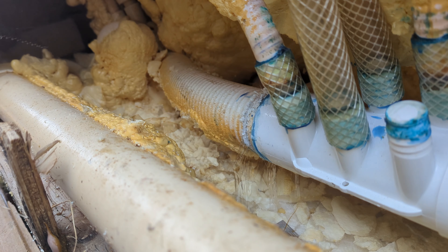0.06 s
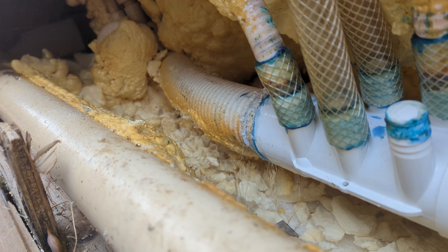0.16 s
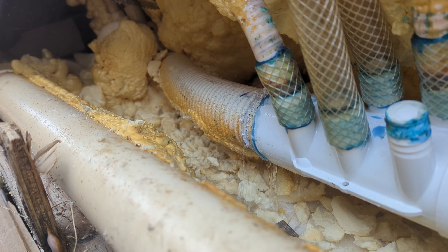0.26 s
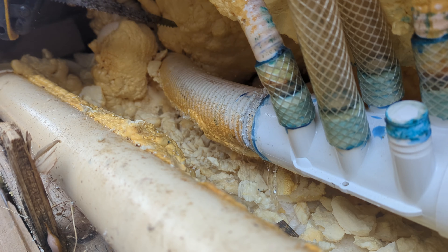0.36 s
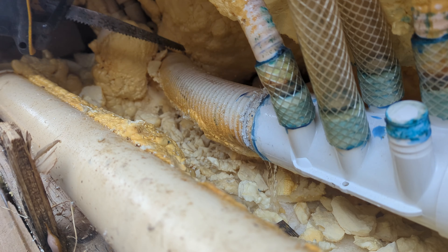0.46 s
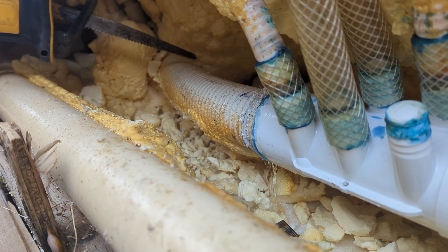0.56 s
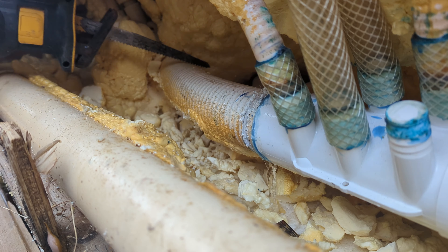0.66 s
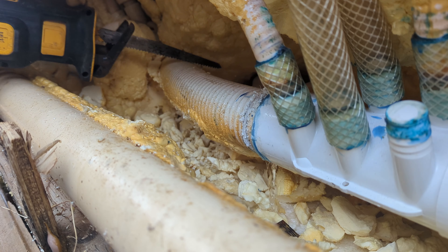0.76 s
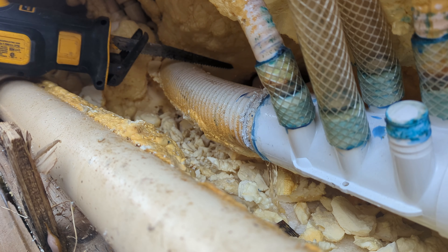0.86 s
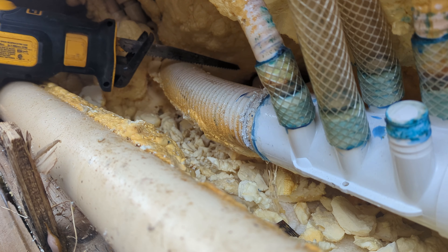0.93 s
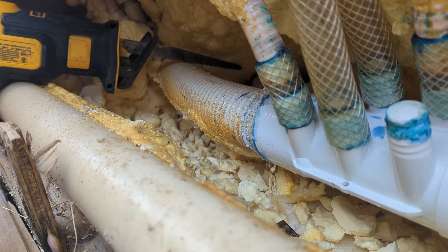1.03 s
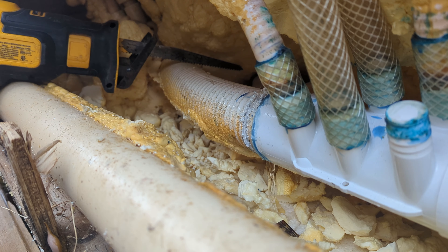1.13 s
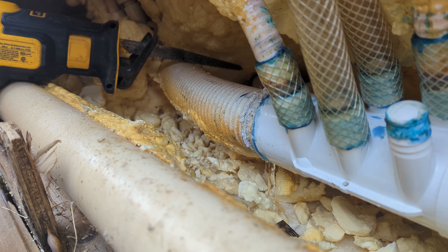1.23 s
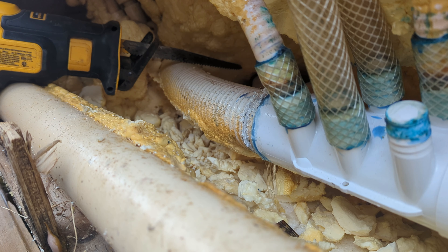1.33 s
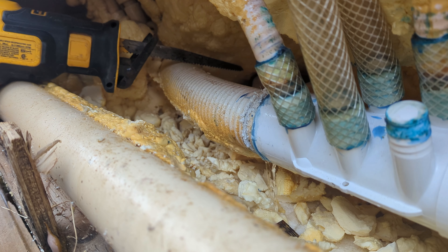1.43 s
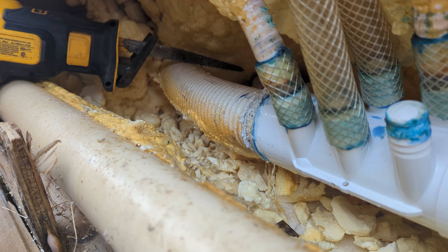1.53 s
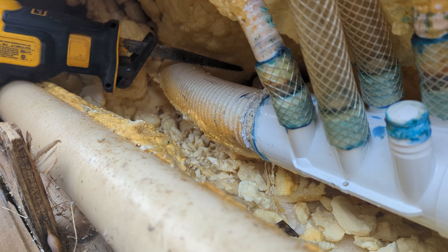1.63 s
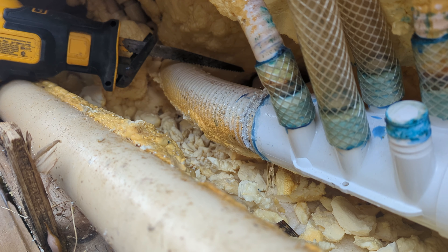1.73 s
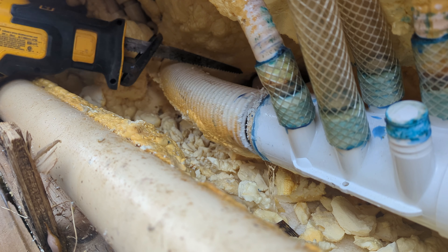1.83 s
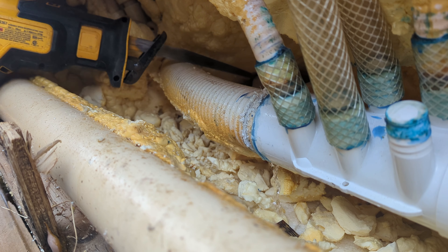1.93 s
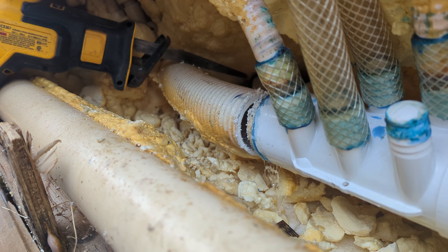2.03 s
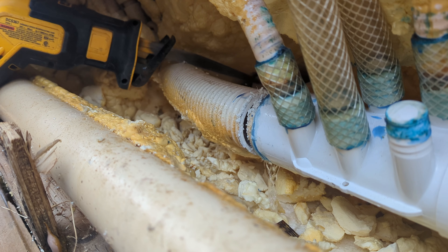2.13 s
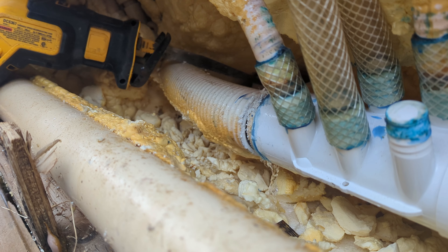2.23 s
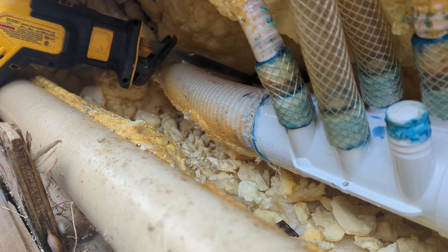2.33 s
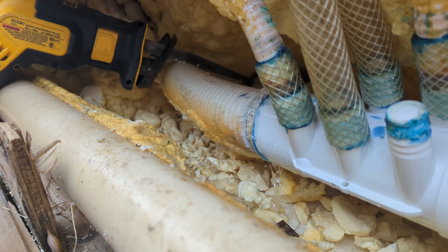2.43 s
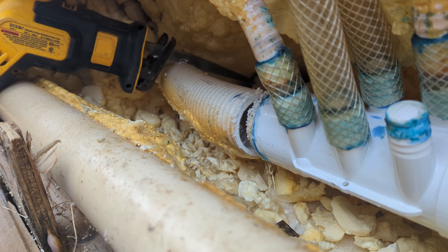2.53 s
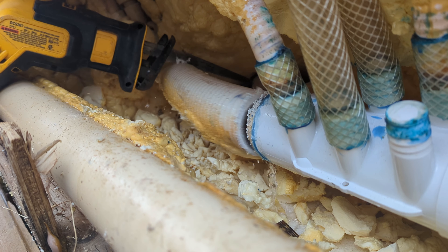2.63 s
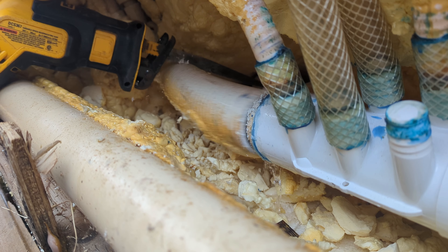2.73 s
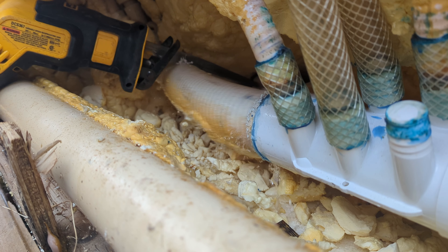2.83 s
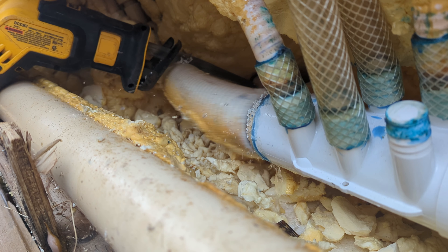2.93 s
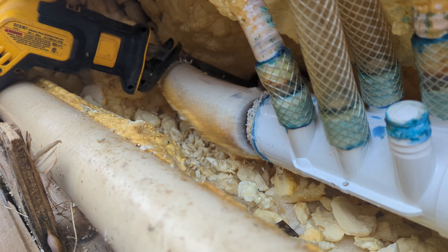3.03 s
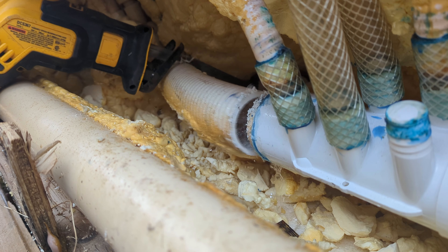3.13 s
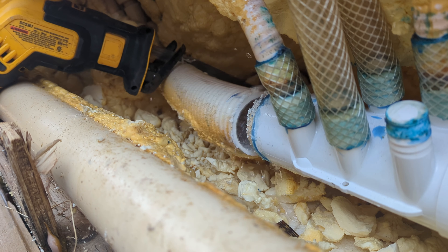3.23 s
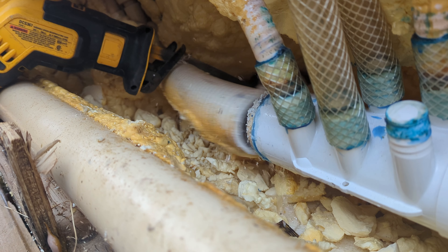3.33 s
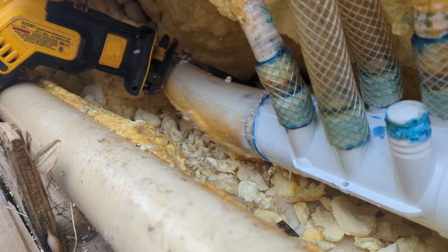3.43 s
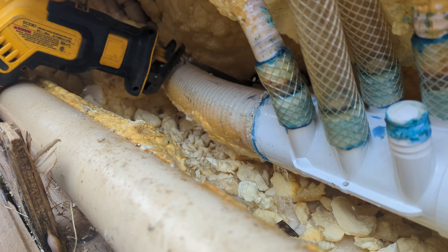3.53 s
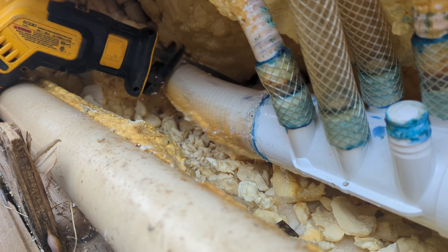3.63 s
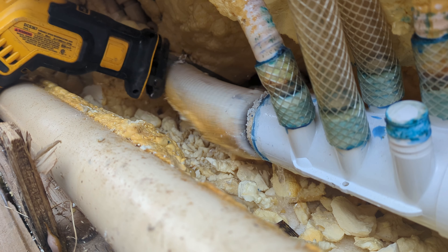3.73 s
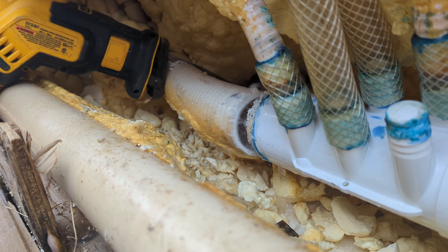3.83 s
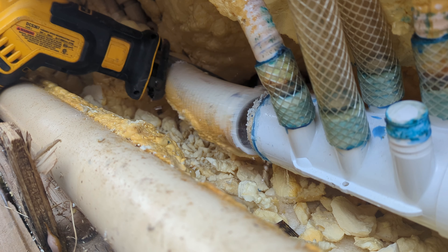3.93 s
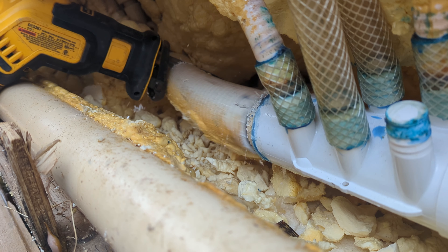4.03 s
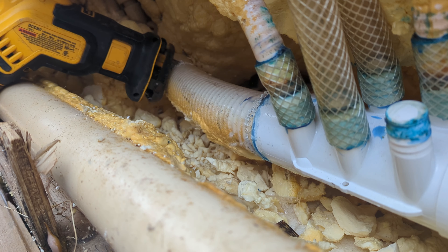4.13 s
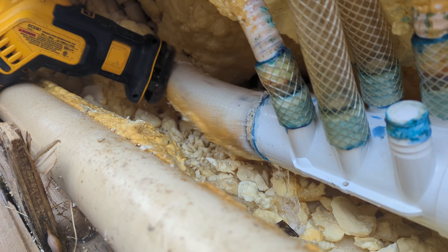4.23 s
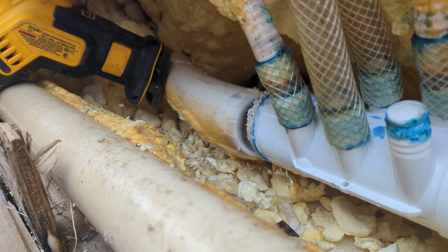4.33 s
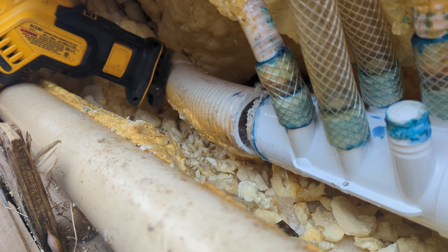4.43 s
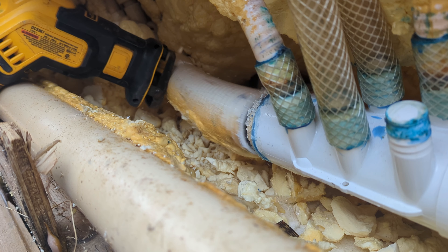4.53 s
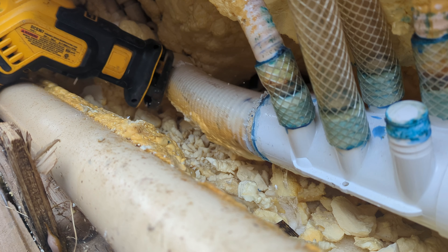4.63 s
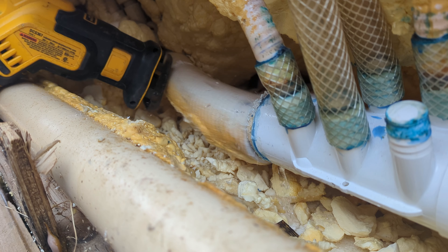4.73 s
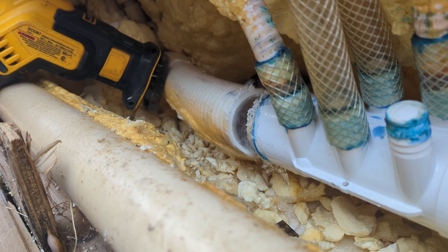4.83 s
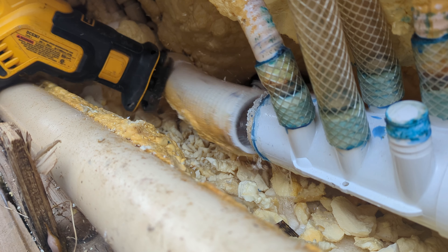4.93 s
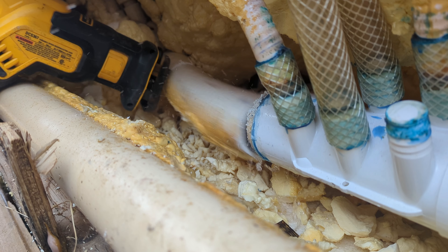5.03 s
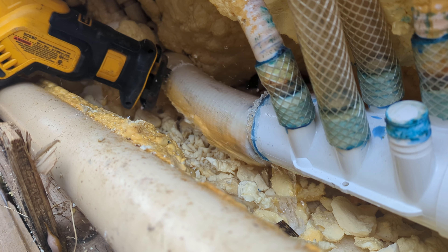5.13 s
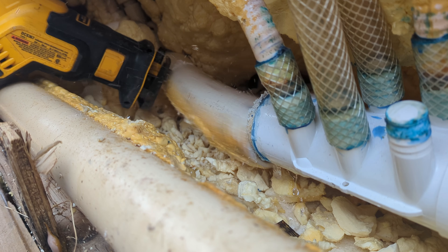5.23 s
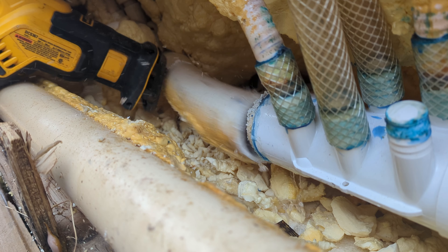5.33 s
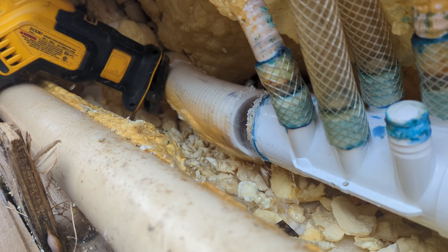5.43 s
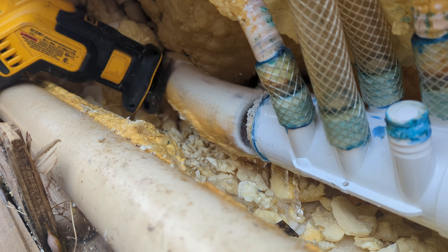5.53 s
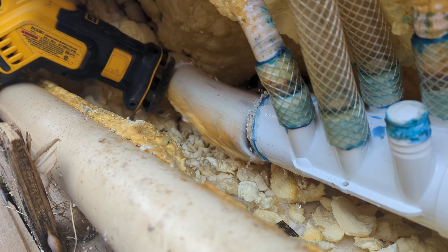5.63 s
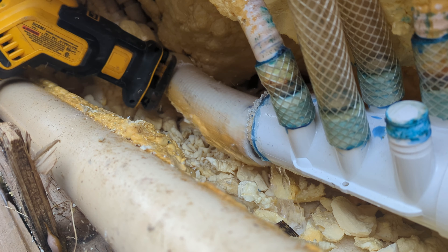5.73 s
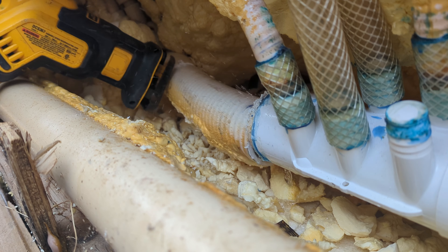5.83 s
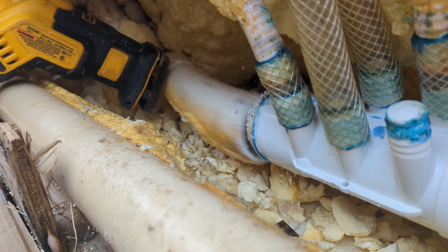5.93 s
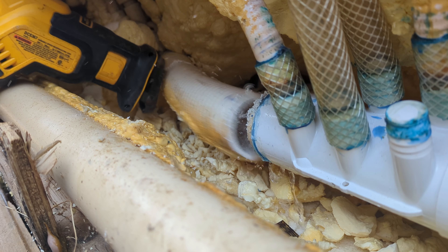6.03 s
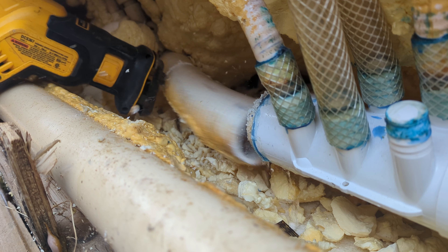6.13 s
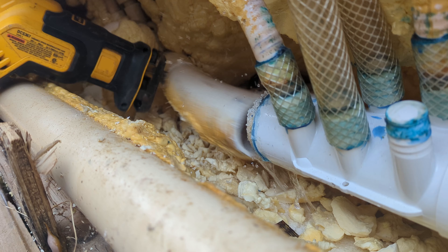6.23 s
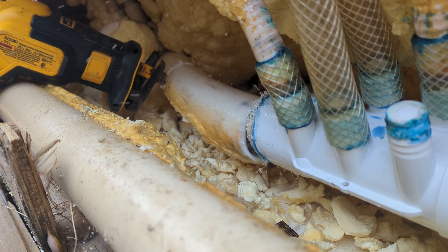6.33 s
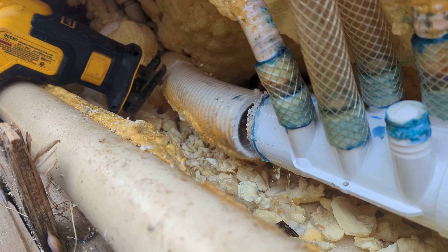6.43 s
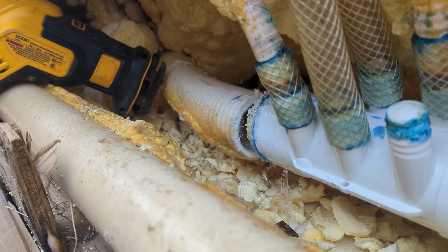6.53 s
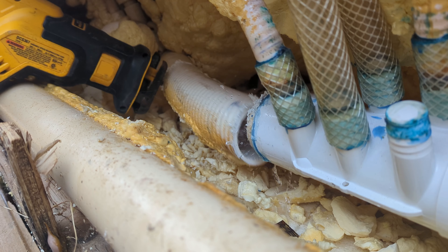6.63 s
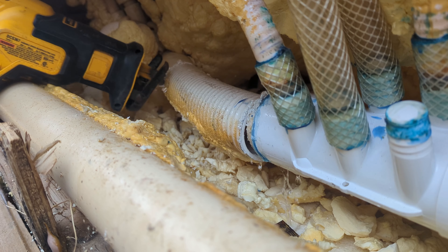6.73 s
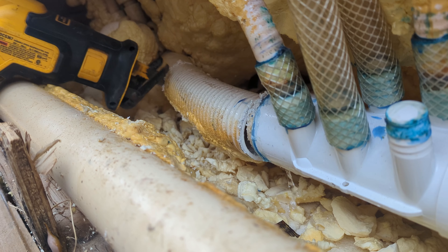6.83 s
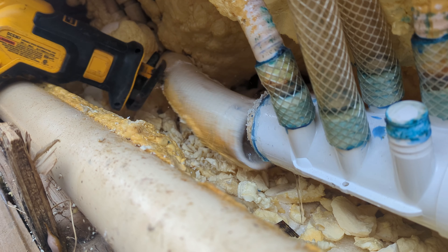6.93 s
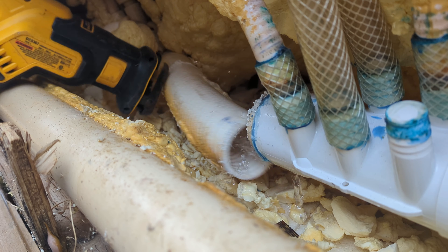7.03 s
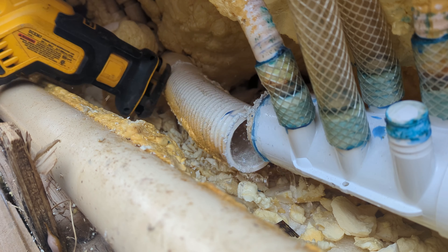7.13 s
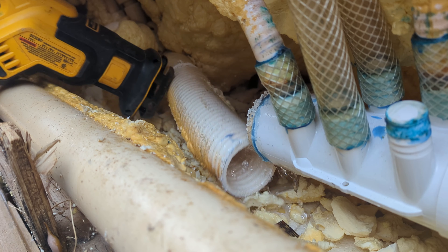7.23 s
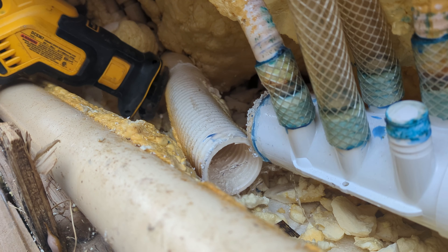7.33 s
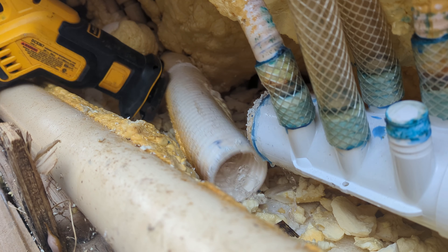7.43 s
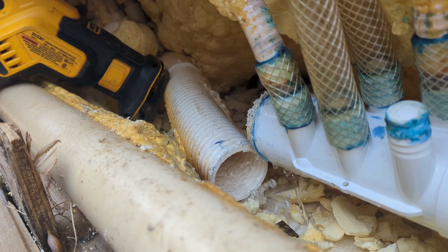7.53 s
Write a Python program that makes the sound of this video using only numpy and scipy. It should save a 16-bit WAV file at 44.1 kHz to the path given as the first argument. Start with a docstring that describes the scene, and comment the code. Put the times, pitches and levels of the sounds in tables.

```python
"""A cordless saw cuts a plastic hose

A reciprocating (back-and-forth) saw is pushed into a foam-lined cavity, set on a ribbed hose and started.
Every stroke thumps the housing, knocks the hose and clacks in the drive while the teeth rasp.
Once the hose hangs loose it booms freely and slaps about on every other stroke or so.
Sounds are built in two rows: mid (what both ears share) and side (how they differ)."""
import sys
import numpy as np
from scipy import signal
from scipy.fft import rfft, irfft, next_fast_len
from scipy.io import wavfile
from scipy.ndimage import uniform_filter1d

SR = 44100
rng = np.random.default_rng(int(sys.argv[2]) if len(sys.argv) > 2 else 0)


def to_wav(sig):
    """Store sig (one row per channel, or 1-D mono) as 16-bit WAV at the path in sys.argv[1].

    Samples outside -1..1 are clipped; the rate is SR.
    """
    pcm = np.clip(np.atleast_2d(sig), -1, 1) * 32767
    pcm = np.round(pcm).astype(np.int16)
    wavfile.write(sys.argv[1], SR, pcm.T)  # frames by channels


N = 333837
TIME_S = np.arange(N) / SR
FFT_SIZE = next_fast_len(N + SR // 4)

# Saw speed; one crank turn is one stroke: time_s, strokes_per_s
STROKE_RATE = [(1.9, 22.17), (2.0, 26.83), (2.13, 28.1), (2.35, 27.72), (2.6, 27.93), (2.75, 36.62),
               (2.9, 38.63), (3.2, 38.84), (3.6, 38.51), (4.0, 38.22), (4.4, 38.35), (4.8, 37.68),
               (5.2, 38.35), (5.6, 38.37), (6.0, 38.63), (6.3, 37.0), (6.45, 41.0), (7.57, 40.5)]
# Strength of the four low booms: time_s, frame_db, floor_db, panel_db, hose_db
BOOM_LEVELS = [(1.829, -60.5, -59, -59, -53), (1.845, -43.5, -50, -48, -55), (1.89, -45, -48, -52, -53),
               (1.96, -54, -50, -50, -45), (1.978, -37, -37, -36, -35), (2.16, -30.5, -29, -30.5, -26.5),
               (2.3, -38.5, -31.5, -34, -30.5), (2.54, -41, -33, -24.5, -35), (2.8, -38, -38, -30.5, -32.5),
               (3.55, -38.5, -37, -32.5, -34.5), (3.82, -42, -41, -36.5, -29), (4.1, -52, -35, -31.5, -35),
               (4.35, -53, -41, -36.5, -32.5), (4.8, -57, -39.5, -38.5, -34.5),
               (5.15, -42, -35, -32.5, -29.5), (5.76, -42, -31, -30, -36.5),
               (6.11, -43, -32.5, -33.5, -26.5), (6.3, -41, -33, -31.5, -31), (6.5, -41, -35, -21, -31),
               (6.78, -36, -30.5, -28.5, -27), (6.9, -37, -40, -31.5, -35), (7.03, -39, -36, -24, -32),
               (7.57, -31.5, -30, -23.5, -51)]
# Their modes (pitches at which a thing likes to ring), in that order: pitch_hz, base_width_hz, delay_s
BOOM_MODES = [(78, 25, .004), (118, 25, -.003), (143, 28, .0015), (190, 25, 0.)]
# Knocks in the hose as the cut deepens: time_s, wall_db, bore_db, rib_db
KNOCK_LEVELS = [(2.01, -35, -48, -39.5), (2.2, -35.5, -44, -42), (2.9, -34, -36, -42),
                (3.28, -33.5, -29.5, -37), (3.62, -32, -32.5, -37), (4.18, -34, -37, -39),
                (4.7, -36.5, -35.5, -35.5), (5.05, -43, -41, -35.5), (5.2, -43, -39.5, -37.5),
                (5.33, -46.5, -49, -47), (5.45, -39.5, -37.5, -35.5), (6.05, -46, -40, -43),
                (6.47, -41.5, -45, -41.5), (6.88, -41.5, -48, -40), (7.57, -41, -44, -48.5)]
# Modes of the hose's wall, bore (hollow inside) and ribs: pitch_hz, base_width_hz, gain_db
WALL_MODES = [(231, 52, 1), (264, 67, 1), (319.3, 42, 6.5), (395, 110, -2), (482, 29, 0)]
BORE_MODES = [(575.6, 63, 5.5), (637, 48, -3.5)]
RIB_MODES = [(683, 55, 2), (774, 20.5, -1), (896, 70, -4.5), (1120, 36, -4.5)]
# Strength of the teeth and the drive: time_s, rasp_db, clatter_db
CUT_LEVELS = [(2.02, -32.5, -38.5), (2.25, -37, -40), (2.75, -35, -40), (2.95, -34.5, -38.5),
              (3.35, -36, -41), (3.6, -35, -40), (4.66, -36, -40.5), (5.17, -35.5, -41), (5.34, -37, -42.5),
              (5.65, -34, -40), (6.1, -35.5, -42), (6.5, -36, -45), (6.75, -34, -40), (6.87, -29, -34),
              (6.98, -34.5, -41.5), (7.57, -34.5, -40)]
# Where in a turn the teeth bite hardest, and how much they throb: time_s, position_turns, depth_db
THROB = [(1.9, 1.3, 2.5), (2.4, 1.3, 2), (2.8, 1.2, 1), (3.8, 1.1, 1), (4.2, .93, 3), (5.9, .95, 2.8),
         (6.2, .95, 1), (6.45, 1.15, 2.8), (7.0, 1.2, 1.5)]
# Slack in the drive, which sets how hard it clacks: time_s, slack_0_to_1
DRIVE_SLACK = [(1.9, .6), (2.05, 1.), (2.6, .9), (2.8, .4), (3.5, .4), (3.9, .9), (4.7, 1.), (5.9, .85),
               (6.1, .4)]
# Tone color of the teeth and the drive: frequency_hz, gain_db
RASP_SPECTRUM = [(530, -10.5), (900, -2), (1020, -1), (1160, 0), (1620, -2), (2310, -4), (2510, -4.5),
                 (3170, -8), (3500, -8), (3810, -10.5), (4740, -9.5), (5400, -15), (5700, -68), (7410, -18),
                 (12500, -120)]
CLATTER_SPECTRUM = [(3120, -27), (5300, -51), (5600, 4), (6410, 7), (7220, 5), (8150, 0.5), (8690, 5),
                    (9360, 3.5), (11900, 6.5), (15100, 7.5), (16000, -18)]
# Single hits: start_s, level_db, pitch_hz
HOSE_SLAPS = [(2.006, -23.5, 388), (5.411, -25, 640), (5.438, -25, 605), (5.545, -25, 755),
              (5.567, -23, 646), (5.726, -27, 1200), (5.805, -25, 1155), (5.853, -22, 560),
              (5.907, -26, 1200), (5.984, -21.5, 676), (6.008, -21, 610), (6.036, -23.5, 696),
              (6.069, -29, 700), (6.087, -20, 700), (6.196, -20, 990), (6.305, -27, 940), (6.335, -23, 770),
              (6.372, -28, 770), (6.407, -27.5, 966), (6.444, -18, 793), (6.493, -19, 760),
              (6.544, -24, 955), (6.555, -24.5, 716), (6.595, -25.5, 833), (6.631, -23.5, 730),
              (6.655, -23, 1046), (6.682, -21.5, 700), (6.706, -24.5, 820), (6.73, -20, 870),
              (6.78, -20, 1040), (6.829, -20, 671), (6.876, -20, 780), (6.929, -19.5, 466),
              (6.978, -19.5, 643), (7.027, -21, 863), (7.08, -27, 1010), (7.089, -21.5, 790),
              (7.123, -30, 804), (7.142, -22, 720), (7.215, -28, 885), (7.34, -29, 563), (7.383, -24, 653),
              (7.434, -24, 940), (7.484, -23.5, 1164), (7.54, -28.5, 910)]  # the hose hits the blade and the shoe (the saw's metal rest)
DRIVE_CLACKS = [(2.0523, -21, 11600), (2.16, -21, 12700), (2.087, -26, 8600), (3.6, -28, 11000),
                (3.74, -21, 10800), (4.325, -28, 11200), (4.36, -25, 10700), (4.7, -23, 11800),
                (4.755, -28, 11300), (4.8048, -24, 11500), (5.308, -22, 14000), (5.9802, -26, 13200),
                (6.727, -36, 11600), (7.0094, -30, 10100), (7.2673, -27, 11100)]  # the drive's sharpest clacks
CLINKS = [(1.832, -36, 4900), (1.9233, -36, 3680), (1.9507, -30, 3900), (1.9836, -28, 2890),
          (2.2396, -31, 4500), (2.2889, -29, 3600), (2.3832, -31, 2850), (2.4556, -32, 2850)]  # the trigger, and the loose blade settling in
TICKS = [(0.7, -48, 802), (0.716, -46, 1170), (0.744, -45, 1150), (0.765, -46, 1080), (0.908, -38.5, 1740),
         (0.915, -45, 1490), (0.909, -52, 9000), (0.935, -53, 8000), (1.029, -46, 1440),
         (1.033, -52, 10000), (1.046, -44, 1010), (1.545, -53, 5540), (1.832, -28, 1300),
         (1.901, -27, 1320)]  # small ticks of blade and trigger
HOSE_CREAKS = [(1.3, -67, 720), (1.555, -62, 657), (1.705, -54.5, 674)]  # the saw leans on the hose
# Blade and shoe ringing as they rub: start_s, end_s, pitch_hz, base_width_hz, level_db
METAL_RINGS = [(1.89, 1.95, 3620, 150, -49), (2.9, 4.0, 1170, 90, -48), (3.95, 6.1, 1200, 200, -43.5),
               (7.1, 7.57, 1150, 120, -48), (1.95, 7.57, 6390, 150, -57), (2.7, 7.57, 7000, 200, -57),
               (2.9, 7.57, 8930, 220, -58), (2.9, 3.7, 9920, 200, -53), (2.7, 5.6, 11650, 350, -54),
               (6.74, 7.0, 10100, 130, -43.5), (7.17, 7.5, 9980, 130, -46.5), (6.55, 7.05, 12180, 150, -49),
               (6.75, 7.25, 11350, 150, -50.5)]
# Modes of the blade while it settles in: pitch_hz, base_width_hz, level_db, position_turns
CHATTER_MODES = [(1400, 70, -41, .15), (3450, 220, -43.5, .4), (2740, 110, -48, 0.), (4850, 200, -51, .3)]
# The tones in one slap: pitch_multiple, gain_db
SLAP_TONES = [(.76, -2), (1., 0), (1.32, -3)]
# Whine of the gears: time_s, level_db
WHINE_LEVELS = [(1.9, -70), (2.0, -57), (2.6, -58), (2.8, -60), (2.9, -48.5), (4.8, -49.5), (5.2, -54),
                (6.0, -55), (6.3, -70)]
# Moves of the saw into place: start_s, hold_s, rumble_db, rub_db, foam_rustle_db
MOVES = [(0.112, 0.38, -83, -99, -79), (0.705, 0.025, -66, -49.5, -72), (0.73, 0.036, -65, -49, -68),
         (0.79, 0.054, -59, -53, -57), (0.884, 0.032, -54, -52, -65), (0.962, 0.05, -51, -68, -77),
         (1.017, 0.01, -37, -52, -61), (1.04, 0.017, -49, -66, -82), (1.16, 0.5, -69.5, -77.5, -78),
         (1.53, 0.0087, -64, -66, -57), (1.688, 0.036, -64.5, -69, -67.5)]
# Tone color of those moves: frequency_hz, gain_db
RUMBLE_SPECTRUM = [(15, -44), (25, -15), (81, 8), (129, 7), (182, -13), (215, -26), (300, -18), (390, -56),
                   (660, -120)]
RUB_SPECTRUM = [(110, -33), (190, -3), (215, 1), (285, -18), (349, -11), (517, -23), (678, -11), (868, -19),
                (1200, -12), (1540, -25), (2800, -27), (3640, -57), (6160, -120)]
RUSTLE_SPECTRUM = [(1350, -7), (2300, -17), (3260, -7.5), (4850, -8.5), (5480, -22), (5990, -8),
                   (8090, -14), (13000, -5), (16000, -21)]
# A faint whistle: time_s, level_db
WHISTLE_LEVELS, WHISTLE_HZ = [(.6, -92), (.68, -78), (1.1, -78), (1.45, -79), (1.6, -82)], 1696
# Tone color of the background air: frequency_hz, gain_db
AIR_SPECTRUM, AIR_DB = [(18, -36), (30, 2.5), (93, 3), (473, -15.5), (540, -22), (1960, -13.5),
                        (5450, -27.5), (14800, -20), (16000, -28)], -72.5
# Stereo width: frequency_hz, side_gain_db
STEREO_WIDTH = [(60, -13), (110, -16.5), (200, -12), (380, -3), (700, -6), (1290, 2.5), (2380, 2),
                (4400, -0.5), (8120, -2.5), (15000, 1.5)]
# Stereo balance: frequency_hz, left_minus_right_db
STEREO_BALANCE = [(60, 1), (110, -1.5), (200, -2.5), (380, -13), (700, -7), (1290, -3.5), (2380, 5.5),
                  (4400, 1.5), (8120, 2.5), (15000, 0.5)]

TRIGGER_S, CATCH_S, FULL_S = 1.83, 1.905, 2.017  # trigger pulled, motor catches, start-up fade ends
SEATED_S, FREED_S, CHANGE_S = 2.75, 6.04, .15  # blade settles, hose comes free, time each change takes
SEATING, HELD, HANGING = .45, .25, .7  # hose looseness, 0-1: blade settling, held by the cut, hanging


def boom(turns, loose):
    """Each stroke pushes four low modes; a loose hose also shakes them and strikes them with its slaps."""
    pushes = (1 - loose) * stroke_clicks(turns, .5, spread_db=1.0, jitter_s=.0002)
    shake = 1.15 * loose * rng.standard_normal((2, N))
    slap_s, slap_db, _ = np.transpose(HOSE_SLAPS)
    at = (slap_s * SR).astype(int)
    force = loose[at] * from_db(slap_db + 21.5).clip(0, 1) ** 2  # light slaps barely touch the boom
    strikes, contacts = np.zeros((2, N))
    strikes[at + round(.01 * SR)] = 60 * force
    contacts[at + round(.004 * SR)] = force
    damping = 1 - .95 * np.convolve(contacts, np.hanning(SR // 50), "same")  # contact briefly mutes it
    wander_db = 2.4 + (loose - HELD)
    out = 0
    for db, (hz, width, delay_s) in zip(in_time(BOOM_LEVELS), BOOM_MODES):
        rise = resonance(pushes[:, ::-1], hz, 1.13 * width)[:, ::-1]  # ringing backwards makes a fade-in
        thump = np.roll(resonance(rise, hz, 1.58 * width), round(delay_s * SR), axis=1)
        shaken = steep_resonance(shake + strikes, hz, width / 3)
        out += from_db(db + wander_db * drift(per_s=8)) * steady(thump + shaken)
    return damping.clip(0, 1) * out


def cutting(turns, loose):
    """The blade knocks the hose and rasps through it; knocks and clatter build up later than the rasp."""
    wall_db, bore_db, rib_db = in_time(KNOCK_LEVELS, before=None)
    rasp_db, clatter_db = in_time(CUT_LEVELS, before=None)
    wall = from_db(wall_db) * hose_knocks(turns, WALL_MODES, .8, chatter=3.5 * loose ** 2, depth_db=.3)
    bore = from_db(bore_db) * hose_knocks(turns, BORE_MODES, .68, chatter=loose, depth_db=2)
    ribs = from_db(rib_db) * hose_knocks(turns, RIB_MODES, .8, chatter=1.6 * loose, depth_db=5)
    rasp = from_db(rasp_db) * teeth_rasp(turns, loose)
    clatter = from_db(clatter_db) * drive_clatter(turns)
    return start_up(catch_db=-7.5) * rasp + start_up(catch_db=-10.5) * (wall + bore + ribs + clatter)


def hose_knocks(turns, modes, at_turn, chatter, depth_db):
    """One blow a stroke plus tooth chatter rings the hose; each mode wavers as the blade shifts."""
    blows = stroke_clicks(turns, at_turn, spread_db=1.0, jitter_s=.00012)
    teeth = chatter * swell(turns, at_turn + .1, depth_db) * gritty_noise(1.5)
    out = 0
    for k, (hz, width, db) in enumerate(modes):
        gain = from_db(db + 2.5 * drift(per_s=4))
        out += (-1) ** k * gain * steep_resonance(blows + teeth, hz, width)
    return steady(out)


def teeth_rasp(turns, loose):
    """The teeth scrape in time with the stroke; the sound thins once the hose hangs loose."""
    scrape = gritty_noise(1.3) * swell(turns, *in_time(THROB, before=None))
    rasp = steady(colored(scrape, RASP_SPECTRUM))
    thinning = .55 * (loose / HANGING) ** 2
    return rasp - thinning * resonance(rasp, hz=850, width_hz=850)


def drive_clatter(turns):
    """Gears and fan hiss, with a short clack once a stroke as the drive reverses."""
    reversals = np.abs(stroke_clicks(turns, .7, spread_db=4.5, jitter_s=.001)[0]) / np.sqrt(SR / 38)
    fade = from_db(-60 / (.045 * SR))  # 60 dB down in 45 ms
    clacks = uniform_filter1d(signal.lfilter([1], [1, -fade], reversals), size=90)  # builds over 2 ms
    slack = in_time(DRIVE_SLACK, before=0)[0]
    return steady(colored(gritty_noise(1.2) * (1 + 1.3 * slack * clacks), CLATTER_SPECTRUM))


def start_up(catch_db):
    """The saw's volume as it starts: silence, a kick from the trigger, a lull, then the motor catches."""
    kick_db = -11.5 - 603 * (TIME_S - TRIGGER_S)
    motor_db = np.interp(TIME_S, [CATCH_S - .012, CATCH_S, FULL_S], [-19, catch_db, 0])
    return from_db(np.maximum(kick_db, motor_db).clip(None, 0)) * (TIME_S >= TRIGGER_S)


def hose_slaps(events, rise_s=.001, hold_s=.005, fade_s=.04):
    """The hose hits blade and shoe: each hollow knock is three tones that die quickly."""
    out, t = np.zeros((2, N + SR)), np.arange(int(fade_s * SR)) / SR
    multiple, db = np.transpose(SLAP_TONES)[:, :, None]
    shape = np.minimum(t / rise_s, 1) * from_db(-60 * (t - hold_s).clip(0) / fade_s)
    for start_s, level_db, hz in events:
        strength, detune, phase = rng.standard_normal((3, 2, len(db), 1))
        pitches = hz * multiple * (1 + .05 * detune)
        tones = from_db(db + 3 * strength) * np.sin(2 * np.pi * (pitches * t + phase))
        add_hit(out, shape * tones.sum(axis=1), start_s, level_db)
    return out[:, :N]


def light_taps(from_s=5.7, gap_s=.0247, chance=.4, low_hz=593, high_hz=1120):
    """Lighter slaps follow the hard ones by chance, a stroke apart: start_s, level_db, pitch_hz."""
    slap_s = np.array(HOSE_SLAPS)[:, :1]
    next_slap_s = np.append(slap_s[1:], N / SR)[:, None]
    times = slap_s + gap_s * np.arange(1, 8)
    times = times[(times < next_slap_s - gap_s / 2) & (times > from_s)]
    luck, strength, pitch = rng.random((len(times), 3)).T
    taps = np.c_[times, -34 + 8 * strength, low_hz * (high_hz / low_hz) ** pitch]
    return taps[luck < chance]


def metal_rings(turns):
    """Rubbing, pulsed by the stroke, makes blade and shoe ring; each ring flares and sinks on its own."""
    at_turn, depth_db = in_time(THROB, before=None)
    rub = swell(turns, at_turn, 1.4 * depth_db) * gritty_noise(3.55)
    out = 0
    for start_s, end_s, hz, width, db in METAL_RINGS:
        fade = np.interp(TIME_S, [start_s - .05, start_s + .12, end_s - .1, end_s + .25], [0, 1, 1, 0])
        out += fade * from_db(db + 2.5 * drift(per_s=12)) * steady(steep_resonance(rub, hz, width))
    return out


def blade_chatter(turns):
    """Until the blade settles in, each stroke shakes its modes one after another."""
    fade = np.interp(TIME_S, [CATCH_S, FULL_S, SEATED_S - CHANGE_S, SEATED_S], [0, 1, 1, 0])
    rub = gritty_noise(4.0)
    out = 0
    for hz, width, db, at_turn in CHATTER_MODES:
        pulses = swell(turns, at_turn, depth_db=8) * rub
        out += from_db(db) * steady(steep_resonance(pulses, hz, width))
    return fade * out


def gear_whine(turns, teeth_per_stroke=122.5):
    """A tone at the rate the gear teeth meet, blurred because they meet unevenly."""
    blur = signal.sosfilt(signal.butter(2, 70, fs=SR, output="sos"), rng.standard_normal((2, 2, N)))
    phase = 2 * np.pi * teeth_per_stroke * turns
    return from_db(in_time(WHINE_LEVELS)[0]) * steady(blur[0] * np.cos(phase) + blur[1] * np.sin(phase))


def handling(rise_s=.012):
    """Moving the saw into place rumbles, rubs and rustles the foam, until the trigger is pulled."""
    out, t = 0, TIME_S[:round(TRIGGER_S * SR)]
    layers = zip([RUMBLE_SPECTRUM, RUB_SPECTRUM, RUSTLE_SPECTRUM], [.7, 4.0, 2.2], [163, 245, 600])
    for k, (spectrum, grit_db, fade_db_per_s) in enumerate(layers):
        power = np.zeros(N)
        for start_s, hold_s, *levels_db in MOVES:
            rise = np.clip((t - start_s) / rise_s, 0, 1)
            fading_s = (t - start_s - rise_s - hold_s).clip(0, 1)
            power[:len(t)] += (rise * from_db(levels_db[k] - fade_db_per_s * fading_s)) ** 2
        out += np.sqrt(power) * steady(colored(gritty_noise(grit_db), spectrum))
    return out


def whistle(width_hz=65, end_s=1.8):
    """A faint wavering whistle before the saw starts: noise narrowed to one pitch."""
    narrow = resonance(rng.standard_normal((2, N)), WHISTLE_HZ, width_hz)
    level_db = in_time(WHISTLE_LEVELS + [(end_s, -110)])[0]
    return from_db(level_db) * steady(resonance(narrow, WHISTLE_HZ, width_hz))


def air():
    """Soft background noise, fainter for the first tenth of a second."""
    hush_db = np.interp(TIME_S, [.09, .11], [-12, 0])
    return from_db(AIR_DB + hush_db) * steady(colored(rng.standard_normal((2, N)), AIR_SPECTRUM))


def short_hits(events, fade_s, noise_share, rise_s, breadth):
    """Clinks, clacks, creaks or ticks: part tone, part noise, dying by 60 dB over fade_s."""
    out, t = np.zeros((2, N + SR)), np.arange(int(fade_s * SR)) / SR
    shape = np.minimum(t / rise_s, 1) * from_db(-60 * t / fade_s)
    for start_s, level_db, hz in events:
        noise = steep_resonance(rng.standard_normal((2, len(t))), hz, hz * breadth)
        ring = (1 - noise_share) * np.sin(2 * np.pi * hz * t) + noise_share * noise / noise.std()
        add_hit(out, shape * ring, start_s, level_db)
    return out[:, :N]


def add_hit(track, hit, start_s, peak_db):
    """Scale a hit to its peak level and add it to the track."""
    i = round(start_s * SR)
    track[:, i:i + hit.shape[1]] += from_db(peak_db) * hit / np.abs(hit).max(axis=1, keepdims=True)


def stroke_clicks(turns, at_turn, spread_db, jitter_s):
    """One click a stroke at a set point of the crank turn, uneven in time and strength."""
    at = np.flatnonzero(np.diff(np.floor(turns - at_turn)) > 0)
    draw = rng.standard_normal((len(at), 3))
    at = (at + draw[:, 0] * jitter_s * SR).astype(int).clip(0, N - 1)
    out = np.zeros((2, N))
    out[:, at] = np.sqrt(SR / 38) * from_db(spread_db * draw[:, 1:].T)  # power near 1 at 38 strokes/s
    return out


def swell(turns, at_turn, depth_db):
    """A volume that peaks once a stroke."""
    return from_db(depth_db * np.cos(2 * np.pi * (turns - at_turn)))


def gritty_noise(grit_db):
    """Noise whose level jumps every 40 samples."""
    grains = np.repeat(rng.exponential(1, N // 40 + 1), 40)[:N].clip(0, 5)
    return from_db(grit_db * grains) * rng.standard_normal((2, N))


def drift(per_s):
    """A slow random wander around zero."""
    points = rng.standard_normal(N // 1000)
    return np.interp(TIME_S * per_s, np.arange(len(points)), points)


def resonance(x, hz, width_hz):
    """Make a sound ring at one pitch; a smaller width rings longer."""
    r = np.exp(-np.pi * width_hz / SR)
    feedback = [1, -2 * r * np.cos(2 * np.pi * hz / SR), r * r]
    return signal.lfilter([(1 - r * r) / 2, 0, (r * r - 1) / 2], feedback, x + 1e-18)


def steep_resonance(x, hz, base_width_hz):
    """Two wider resonances in a row, which shut out far-off pitches better."""
    return resonance(resonance(x, hz, 2 * base_width_hz), hz, 2 * base_width_hz)


def colored(x, spectrum):
    """Give a sound the tone color in a table."""
    return irfft(rfft(x, FFT_SIZE) * spectrum_gain(spectrum), FFT_SIZE)[:, :N]


def spectrum_gain(spectrum):
    """Turn rows of frequency_hz, gain_db into a gain for every frequency."""
    hz, db = np.transpose(spectrum)
    return from_db(np.interp(np.log(np.fft.rfftfreq(FFT_SIZE, 1 / SR) + 1), np.log(hz + 1), db))


def steady(x):
    """Hold the mid's level near 1, averaged over a few strokes."""
    return x / np.sqrt(uniform_filter1d(x[0] ** 2, size=SR // 6).clip(0) + 1e-12)


def in_time(rows, before=-120.):
    """Join a table's timed rows with straight lines: one curve for each value column."""
    times, *columns = np.transpose(rows)
    return [np.interp(TIME_S, times, column, left=before) for column in columns]


def from_db(db):
    """Turn decibels into a multiplier."""
    return 10 ** (np.asarray(db) / 20)


def stereo(sound, lead=.3):
    """Turn mid and side into left and right; some mid joins the side a quarter cycle ahead."""
    mid, side = rfft(sound, FFT_SIZE)
    side = (np.sqrt(1 - lead ** 2) * side + 1j * lead * mid) * spectrum_gain(STEREO_WIDTH)
    lean = np.sqrt(spectrum_gain(STEREO_BALANCE))
    return irfft([(mid + side) * lean, (mid - side) / lean], FFT_SIZE)[:, :N]


def scene():
    """Add up all the sounds; the count of crank turns keeps the saw's layers in step."""
    turns = .877 + np.cumsum(in_time(STROKE_RATE, before=0)[0]) / SR
    change_times = [SEATED_S, SEATED_S + CHANGE_S, FREED_S, FREED_S + CHANGE_S]
    loose = np.interp(TIME_S, change_times, [SEATING, HELD, HELD, HANGING])
    background = air()
    saw = boom(turns, loose) + cutting(turns, loose)
    saw += metal_rings(turns) + blade_chatter(turns) + gear_whine(turns)
    slaps = hose_slaps([*HOSE_SLAPS, *light_taps()])
    clinks = short_hits(CLINKS, fade_s=.05, noise_share=.7, rise_s=.001, breadth=.3)
    clacks = short_hits(DRIVE_CLACKS, fade_s=.025, noise_share=.9, rise_s=.0015, breadth=.5)
    moves = handling()
    creaks = short_hits(HOSE_CREAKS, fade_s=.25, noise_share=.8, rise_s=.025, breadth=.12)
    ticks = short_hits(TICKS, fade_s=.014, noise_share=.51, rise_s=.0019, breadth=.54)
    return stereo(saw + slaps + clinks + clacks + moves + creaks + ticks + whistle() + background)


def record(dry, threshold_db=-17.47, cutoff_hz=16300):
    """A fast limiter turns down the loud peaks, then the highest treble is cut."""
    over_db = np.maximum(20 * np.log10(np.abs(dry).max(axis=0) + 1e-9) - threshold_db, 0)
    release_db = 250 * TIME_S
    held_db = np.maximum.accumulate(over_db + release_db) - release_db
    gain = from_db(-.8 * uniform_filter1d(held_db, size=64))
    return signal.sosfilt(signal.cheby2(12, 70, cutoff_hz, fs=SR, output="sos"), dry * gain)


dry = scene()
out = record(dry)
to_wav(out)
```